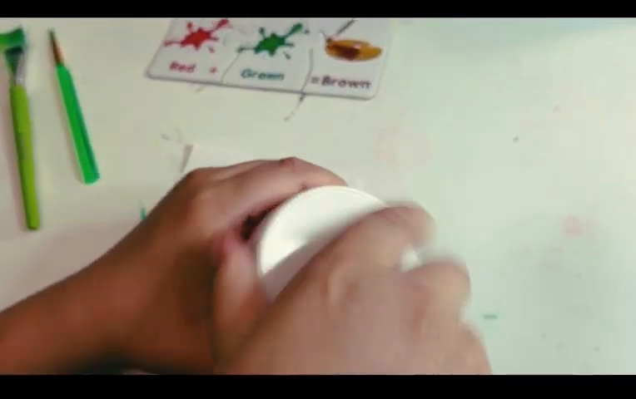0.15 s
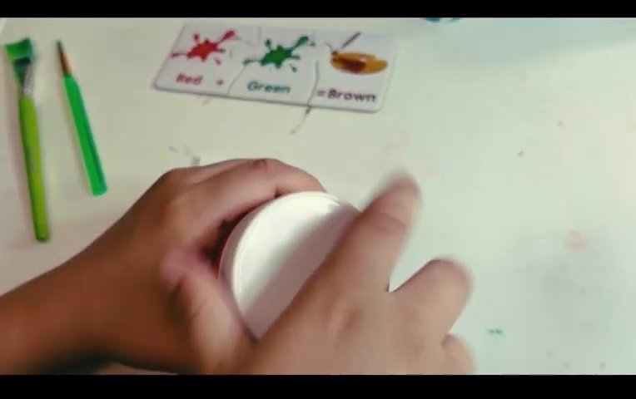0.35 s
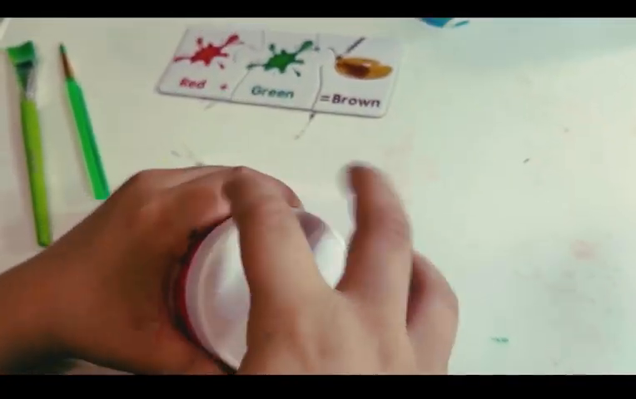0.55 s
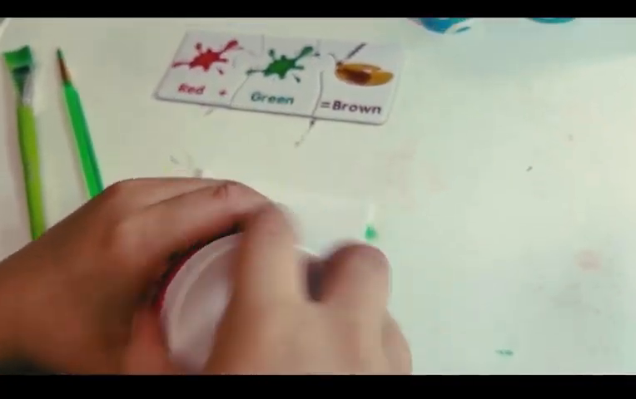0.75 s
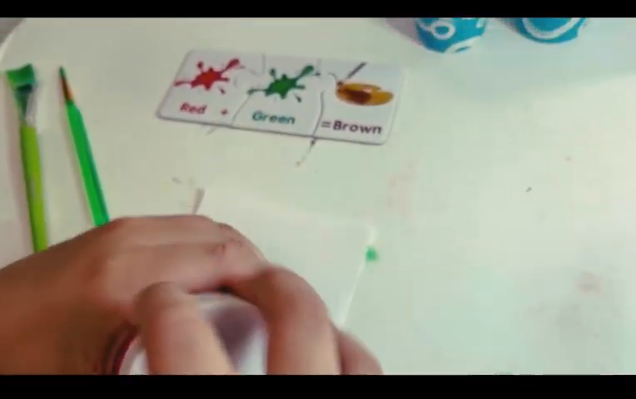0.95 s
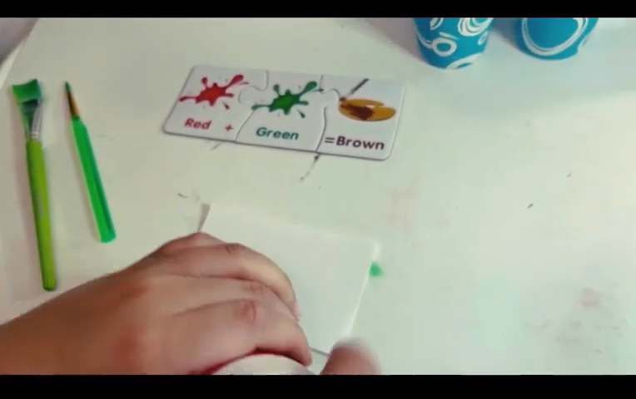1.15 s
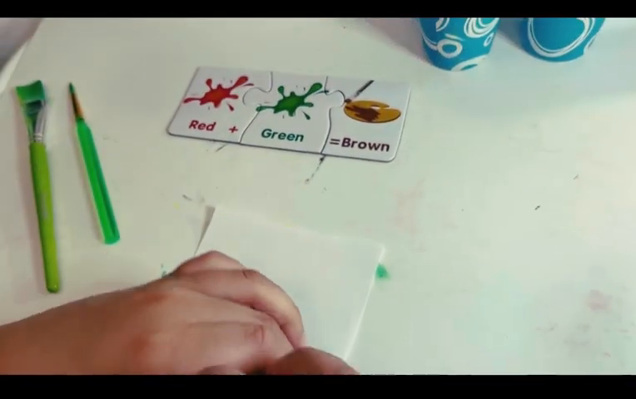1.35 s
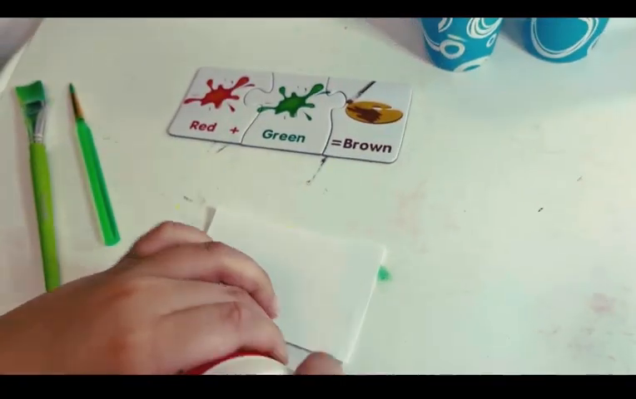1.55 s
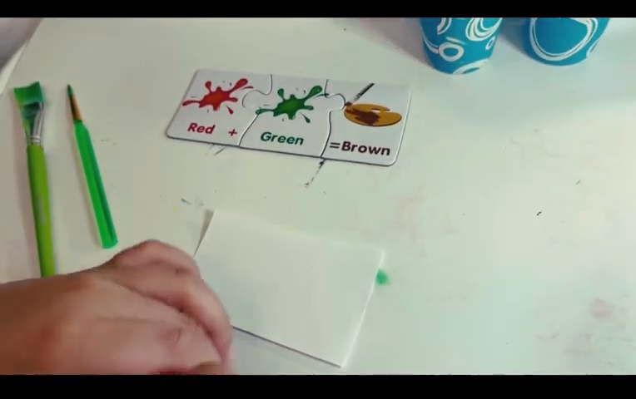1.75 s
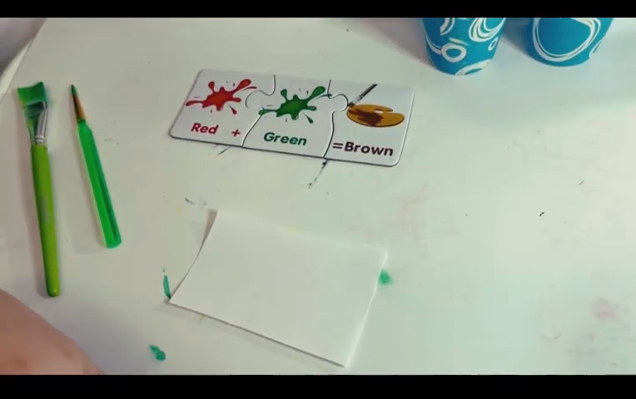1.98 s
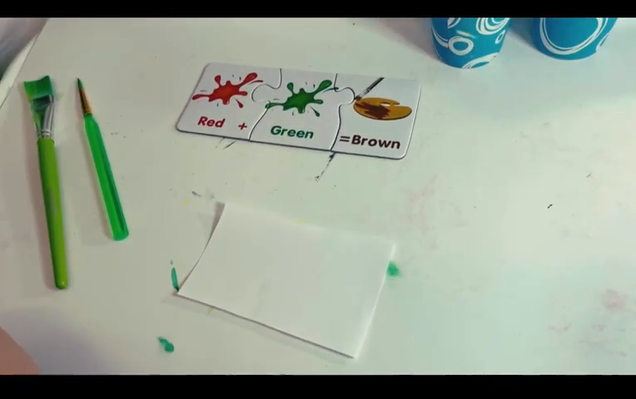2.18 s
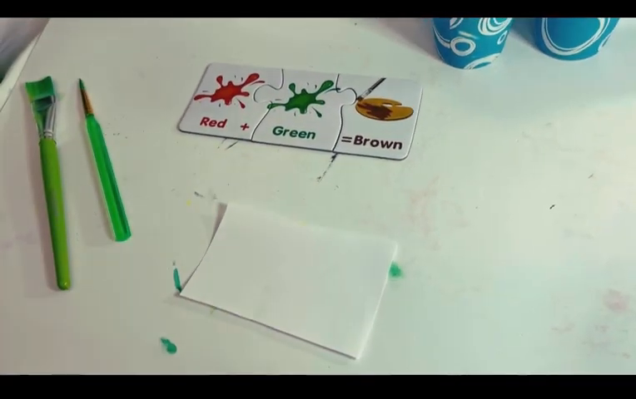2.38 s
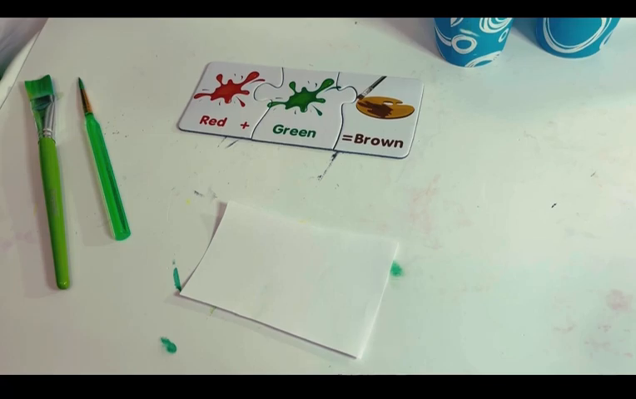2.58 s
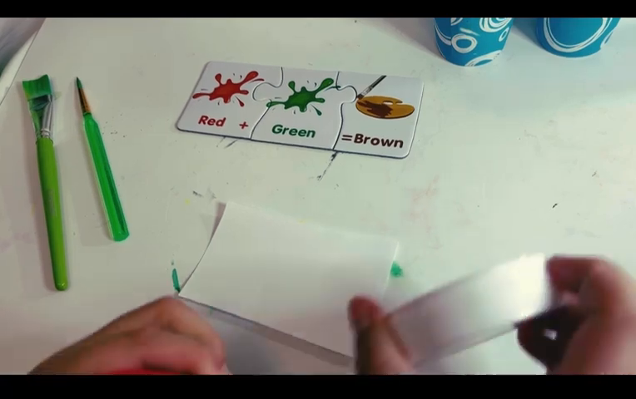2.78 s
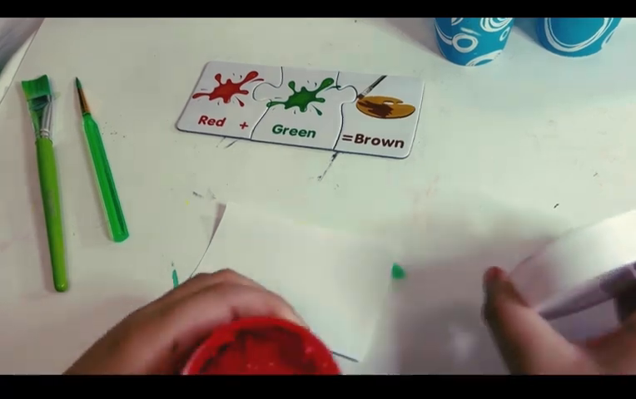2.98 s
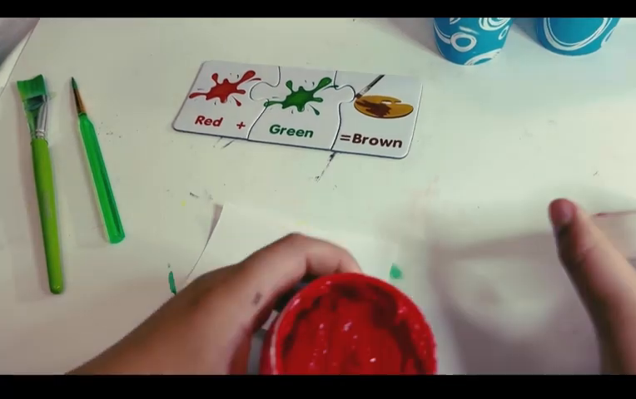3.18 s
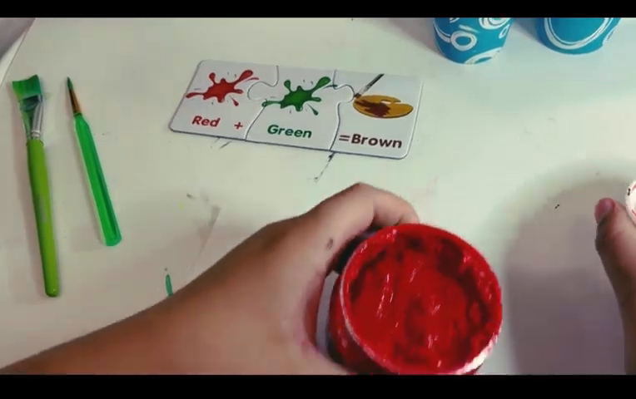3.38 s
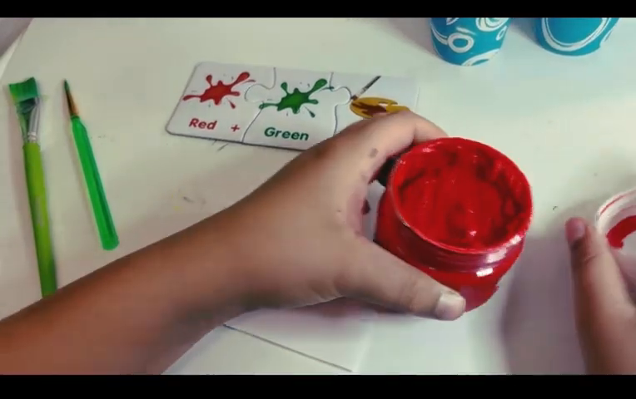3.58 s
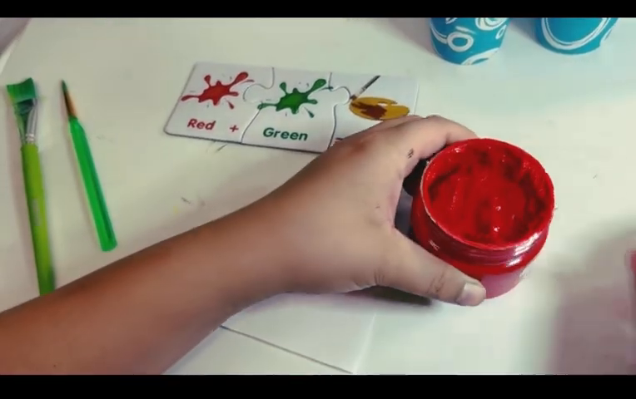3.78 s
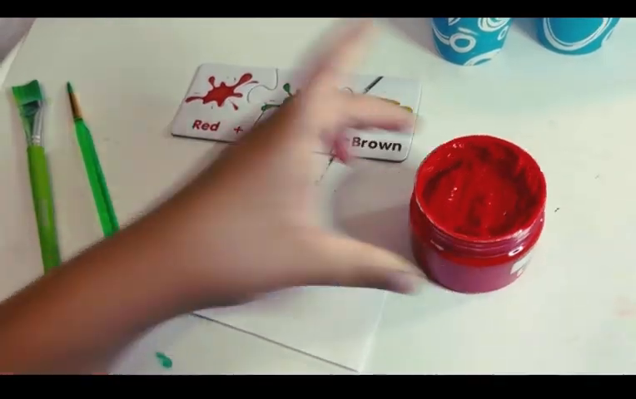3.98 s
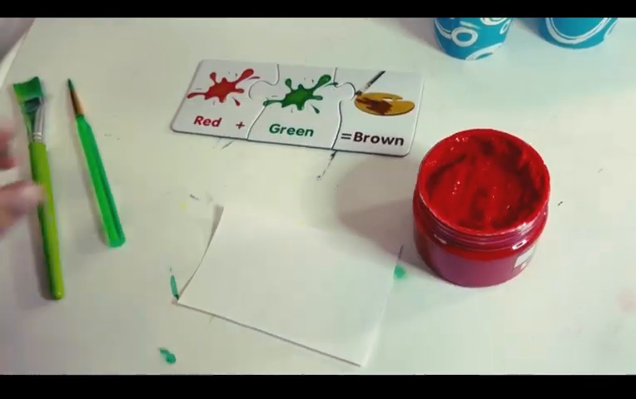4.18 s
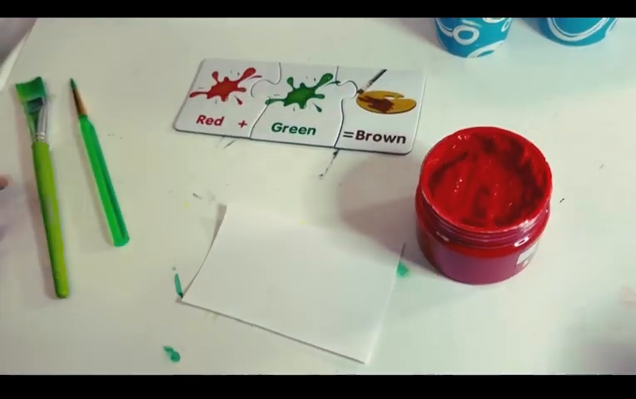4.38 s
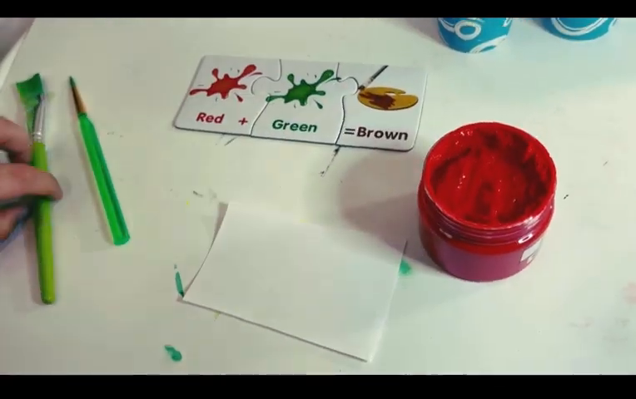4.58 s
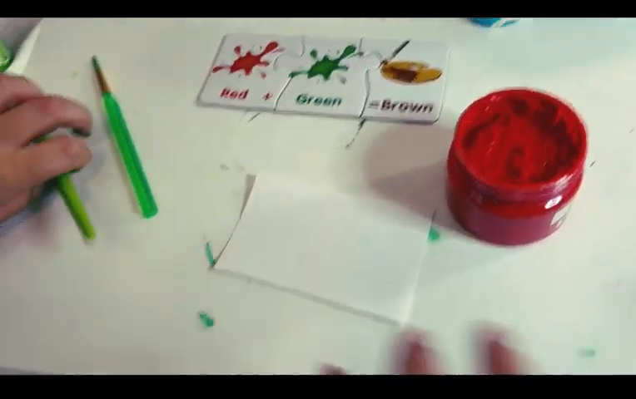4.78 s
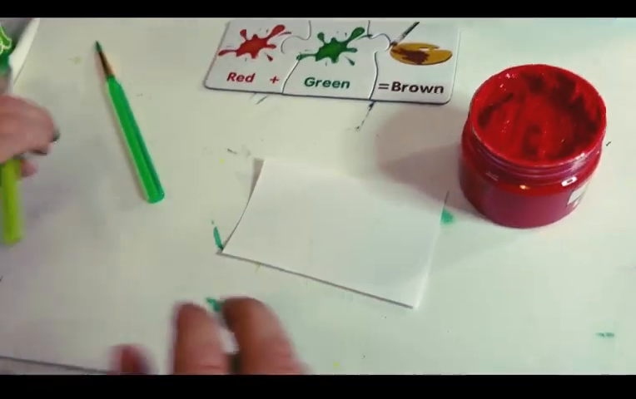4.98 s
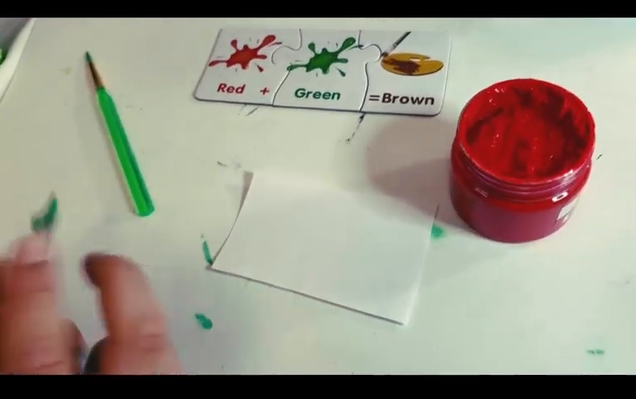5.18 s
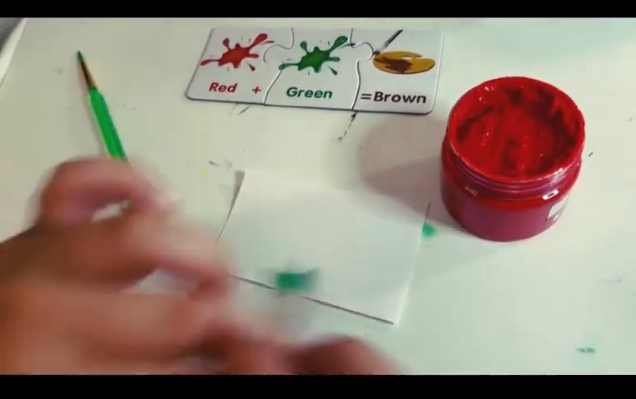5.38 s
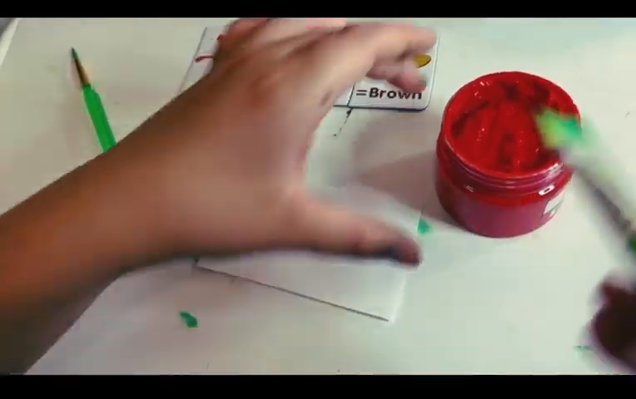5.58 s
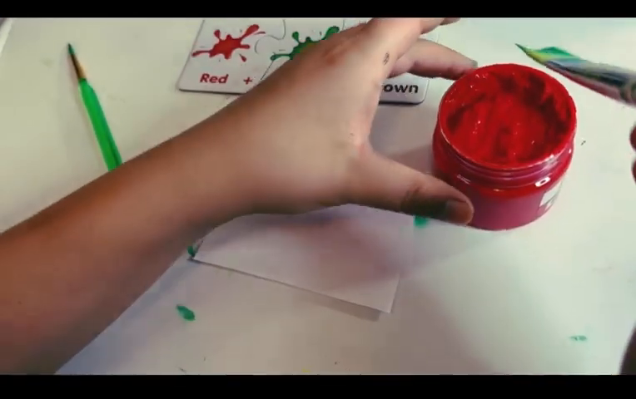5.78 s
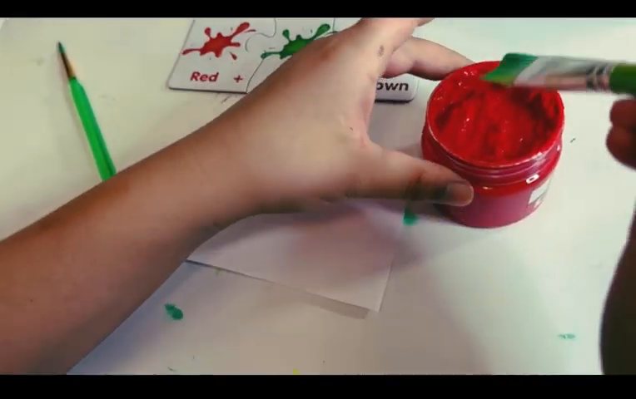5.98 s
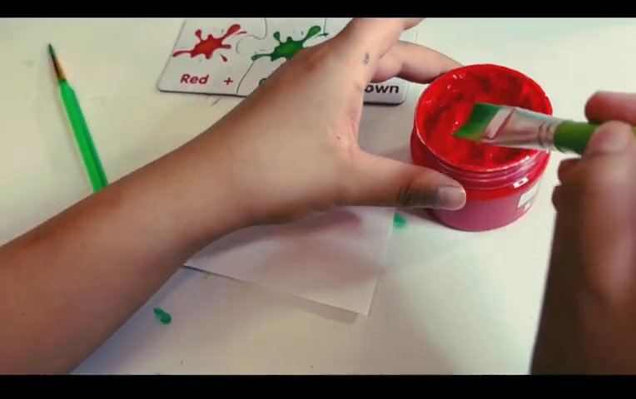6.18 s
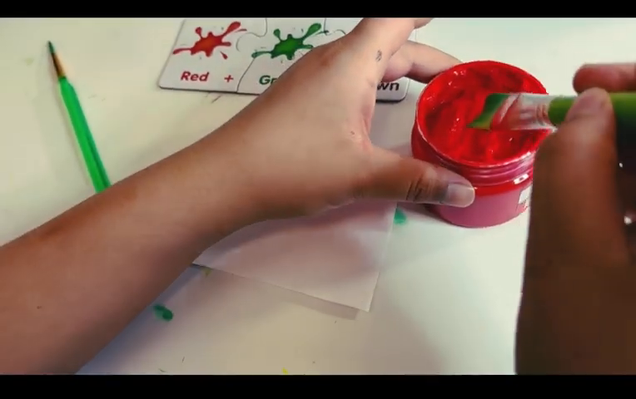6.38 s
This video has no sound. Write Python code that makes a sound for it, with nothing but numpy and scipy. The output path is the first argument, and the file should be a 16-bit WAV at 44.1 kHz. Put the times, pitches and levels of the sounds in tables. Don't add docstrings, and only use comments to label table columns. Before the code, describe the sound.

Close stereo handling sounds over a faint room rumble and airy hush. Thread of a plastic jar lid sticks and slips in bursts of sharp hollow clacks and gritty rubbing, strongest around the first second. After a lull the lid scrapes loose. Much quieter afterwards: rustling hands, a small lid knock, dull thumps and a low hum from the table top, light ticks, tiny wet skin squeaks.

```python
import sys
import numpy as np
from scipy import signal
from scipy.fft import rfft, irfft
from scipy.io import wavfile

SR = 44100
rng = np.random.default_rng(int(sys.argv[2]) if len(sys.argv) > 2 else 0)


def pcm_store(signal):
    levels = np.round(np.clip(np.atleast_2d(signal), -1, 1) * 32767)
    wavfile.write(sys.argv[1], SR, levels.astype(np.int16).T)


def convert_level_to_amplitude(level_db):
    exponent = np.asarray(level_db, float) / 20
    return 10 ** exponent


N = 284223


def at_hz(points, hz):
    p = np.array(points, float)
    return np.interp(np.log(hz + 1), np.log(p[:, 0] + 1), p[:, 1])


def rms_one(x):
    return x / np.sqrt(np.mean(x ** 2) + 1e-20)


def noise():
    return rng.standard_normal(N)


def in_time(rows):
    s, *columns = np.transpose(rows)
    return [np.interp(np.arange(N) / SR, s, column) for column in columns]


def joined(parts):
    rows = []
    for part in parts:
        if rows and part[0][0] - rows[-1][0] > .3:
            rows.append((rows[-1][0] + .03, -110, *rows[-1][2:]))
            rows.append((part[0][0] - .03, -110, *part[0][2:]))
        rows += part
    end = (rows[-1][0] + .03, -110, *rows[-1][2:])
    return in_time(sorted(rows + [end]))


def drift(rate_hz):
    r = np.exp(-80 * np.pi * rate_hz / SR)
    slow = signal.lfilter([1], [1, -2 * r, r * r], rng.standard_normal(N // 40 + 2002))[2000:]
    return np.interp(np.arange(N) / 40, np.arange(len(slow)), rms_one(slow))


def ring(clicks, hz, t60):
    r = convert_level_to_amplitude(-60 / (max(t60, .002) * SR))
    w = 2 * np.pi * hz / SR
    return signal.lfilter([0, np.sin(w)], [1, -2 * r * np.cos(w), r * r], clicks + 1e-18)


def resonance(x, hz, width_hz):
    r = np.exp(-np.pi * width_hz / SR)
    rise = np.array([1, 0, -1]) * (1 - r * r) / 2
    fall = [1, -2 * r * np.cos(2 * np.pi * hz / SR), r * r]
    return signal.lfilter(rise, fall, signal.lfilter(rise, fall, x))


def coloured(x, spectrum):
    hz = np.fft.rfftfreq(N, 1 / SR)
    return rms_one(irfft(rfft(x) * convert_level_to_amplitude(at_hz(spectrum, hz)), N))


def grains(per_s, spread_db):
    sizes = convert_level_to_amplitude(spread_db * np.minimum(rng.exponential(1, N), 5))
    signs = rng.choice([-1, 1], N)
    return rms_one(sizes * signs * (rng.random(N) < per_s / SR))


def struck(times, peak_db, modes, contact_s, scatter_db):
    out = np.zeros(N)
    at = (np.asarray(times) * SR).astype(int)
    luck = rng.standard_normal((len(at), len(modes)))
    for k, (hz, level_db, t60) in enumerate(modes):
        force = np.zeros(N)
        np.add.at(force, at, convert_level_to_amplitude(peak_db + level_db + scatter_db * luck[:, k]))
        out += ring(force, hz, t60)
    r = np.exp(-1 / (contact_s * SR))
    return signal.lfilter([1 - r], [1, -r], out)


# f/Hz, phase/rad
PORT_LEAD = [(0, 0), (860, .7), (1250, .5), (1900, .9), (3000, .9), (4650, .4), (5860, -.9), (7000, -1.8),
             (7800, -2.85), (8900, -3.4), (11200, -6.0), (12900, -6.55), (14600, -9), (16500, -9.6)]
# f/Hz, level difference/dB
PORT_BALANCE = [(60, 0.0), (110, 1), (200, 0.0), (380, 3.5), (700, -5.5), (1290, -3.5), (2380, 2.5),
                (4400, 3.5), (8120, 3), (15000, -1)]


def ports(x):
    hz = np.fft.rfftfreq(N, 1 / SR)
    half_lead = np.exp(.5j * np.interp(hz, *np.transpose(PORT_LEAD)))
    half = convert_level_to_amplitude(at_hz(PORT_BALANCE, hz) / 2) * half_lead
    return np.array([irfft(rfft(x) * half, N), irfft(rfft(x) / half, N)])


# f/Hz, share of power/1
DIFFUSE = [(60, .05), (290, .2), (700, .6), (1500, .6), (2500, .35), (6000, .06), (7500, .002),
           (15000, .002)]


def spread(make):
    share = np.clip(at_hz(DIFFUSE, np.fft.rfftfreq(N, 1 / SR)), 0, 1)
    common = ports(make())
    own = np.array([make(), make()])
    return irfft(rfft(common) * np.sqrt(1 - share) + rfft(own) * np.sqrt(share), N)


# t/s, rumble level/dB, air level/dB
ROOM = [(0.0, -57, -76), (0.45, -64.5, -71.5), (0.61, -65, -65), (1.0, -58, -94), (1.2, -68, -59.5),
        (1.61, -60.5, -73), (1.97, -63.5, -74.5), (2.53, -68.5, -77), (2.87, -64, -80), (3.1, -66.5, -74.5),
        (3.75, -62.5, -66), (4.05, -59.5, -71), (4.64, -60, -76), (4.9, -66.5, -81), (5.87, -61.5, -74),
        (6.1, -64, -80), (6.44, -65.5, -78)]
# f/Hz, level/dB per Hz
RUMBLE = [(15, -38), (25, -3.5), (65, 1), (167, -1), (221, -6), (270, -2), (313, -10), (408, -14),
          (532, -16.5), (600, -22.5), (780, -55.5), (1320, -120)]
# f/Hz, level/dB per Hz
AIR = [(250, -8), (500, -2), (900, -0.5), (1500, -3), (2500, -17), (6000, -24.5), (15000, -33.5)]


def room_air():
    rumble_db, air_db = in_time(ROOM)
    rumble = spread(lambda: coloured(noise(), RUMBLE))
    air = spread(lambda: coloured(noise(), AIR))
    return convert_level_to_amplitude(rumble_db + 1.5 * drift(6)) * rumble + convert_level_to_amplitude(air_db + 1 + 0.76 * drift(10)) * air


def patchy(spectrum, edges_hz, depth_db):
    whole = spread(lambda: coloured(grains(per_s=6000, spread_db=1.5), spectrum))
    out = 0
    for edge in zip(edges_hz, edges_hz[1:]):
        band = signal.sosfilt(signal.butter(2, edge, "band", fs=SR, output="sos"), whole)
        out = out + band * convert_level_to_amplitude(depth_db * np.tanh(drift(7.9)))
    return out


# t/s, dull level/dB, bright level/dB
RUSTLE = [
    [(0.0, -64.5, -71.5), (0.236, -56.5, -65.5), (0.25, -63, -66)],
    [(0.28, -68, -86), (0.332, -77, -84), (0.39, -70, -68)],
    [(0.41, -62, -70), (0.57, -53.5, -64), (0.66, -82, -90)],
    [(0.69, -53.5, -75), (0.814, -64, -67), (0.91, -74, -79)],
    [(0.94, -74, -73), (1.044, -74, -79), (1.12, -98, -108)],
    [(1.15, -37.5, -49), (1.16, -60.5, -68.5), (1.45, -75, -73)],
    [(1.47, -74, -93), (1.51, -101, -108), (1.52, -90, -72)],
    [(1.55, -59, -60), (1.598, -65, -79), (1.642, -57.5, -64), (2.092, -90, -85.5), (2.2, -83.5, -74.5)],
    [(2.3, -41, -51), (2.372, -80, -87), (2.62, -72, -73)],
    [(2.72, -76, -89), (2.928, -74.5, -61.5), (2.96, -72.5, -94)],
    [(3.0, -59, -69.5), (3.108, -51.5, -58), (3.158, -61.5, -73), (3.36, -64, -63.5)],
    [(3.39, -67.5, -76), (3.616, -56.5, -65.5), (3.926, -61, -77), (4.048, -80.5, -89), (4.128, -74, -72),
     (4.26, -83, -84.5)],
    [(4.3, -66, -87), (4.336, -58.5, -67.5), (4.762, -80, -88), (4.802, -60.5, -74), (4.864, -91, -93.5),
     (5.05, -101, -103)],
    [(5.09, -93, -87), (5.12, -72, -77), (5.408, -85.5, -71), (5.452, -83.5, -94), (5.86, -74.5, -72.5),
     (6.0, -88.5, -92)],
    [(6.05, -101, -108), (6.218, -77.5, -94), (6.236, -86, -108), (6.44, -99, -107)],
]
# f/Hz, level/dB per Hz
DULL = [(900, -17), (1600, -6.5), (2700, -0.5), (4000, -1.5), (6000, -7.5), (8000, -8.5), (11000, -29.5)]
# f/Hz, level/dB per Hz
BRIGHT = [(4000, -24), (6500, -6.5), (8500, 2.5), (11000, -3.5), (14000, -6.5), (16000, -12)]


def rustle():
    dull_db, bright_db = joined(RUSTLE)
    flutter = convert_level_to_amplitude(1.5 * drift(70))
    dull = patchy(DULL, [600, 1300, 2000, 2900, 4200, 6000, 9000], depth_db=3.5)
    bright = patchy(BRIGHT, [4000, 7000, 10000, 12500, 16500], depth_db=2.2)
    return flutter * (convert_level_to_amplitude(dull_db + 1.5) * dull + convert_level_to_amplitude(bright_db + 11.5) * bright)


# t/s, rub level/dB, crackle level/dB re rub
RUB = [
    [(0.0, -51, -12), (0.03, -81, -14.0), (0.224, -45, -5), (0.3, -88, -14.0)],
    [(0.32, -78, -14.0), (0.352, -85, -14.0), (0.42, -64, -17)],
    [(0.43, -78.5, -14.0), (0.454, -43.5, -27), (0.67, -51, -37)],
    [(0.68, -37, -35), (0.82, -48.5, -10), (0.92, -70, -19)],
    [(0.93, -75, -10), (0.974, -43, -12.5), (1.13, -64.5, -12.5)],
    [(1.14, -28, -12.5), (1.212, -54, -15.5), (1.456, -58.5, -10), (1.5, -95.5, -18)],
    [(1.52, -79, -16), (1.538, -36, -30), (1.548, -36, -20.5), (1.596, -52, -16.5), (2.14, -85, -20),
     (2.2, -66.5, -11)],
    [(2.22, -69, -2.5), (2.278, -30, -13.5), (2.45, -101.5, -16.5)],
    [(3.25, -85, -14.5), (3.322, -54, -6), (3.45, -82, -11.5)],
]
# f/Hz, level/dB, t60/s
LID = [(1260, 0, 0.026), (1323, -5.5, 0.037), (2365, -13.5, 0.017), (1500, -17.5, .012)]
# f/Hz, level/dB, t60/s
BELLY = [(260, -8.5, 0.044), (367, -7.5, .04), (553, -5, .03), (700, 3, 0.027), (860, -10, 0.018)]
# f/Hz, level/dB per Hz
CRACK = [(400, -42), (1200, -26), (2200, -10), (3200, -2), (5000, -2), (6600, 3), (8500, 2.5),
         (10800, -4.6), (14000, -8), (16500, -21.5)]


def thread_rub():
    rub_db, crackle_db = joined(RUB)
    force = grains(per_s=1300, spread_db=5.5) * convert_level_to_amplitude(3.0 * drift(56))

    def body(modes):
        return rms_one(sum(convert_level_to_amplitude(level_db) * ring(force, hz, t60) for hz, level_db, t60 in modes))

    smear = rng.standard_normal(60) * np.exp(-np.arange(60) / 20)
    crackle = coloured(signal.lfilter(smear, [1], force), CRACK)
    return convert_level_to_amplitude(rub_db - 7.5) * (body(LID) + convert_level_to_amplitude(-4) * body(BELLY) + convert_level_to_amplitude(crackle_db) * crackle)


def cracks(times, peak_db):
    force, span = np.zeros(N), np.arange(700)
    luck = rng.standard_normal((len(times), len(span) + 1))
    length = .0015 * SR * convert_level_to_amplitude(1.5 * luck[:, :1])
    burst = luck[:, 1:] * np.exp(-span / length) * (1 - np.exp(-span / 6.8))
    at = (times * SR).astype(int)[:, None] + span
    np.add.at(force, at, convert_level_to_amplitude(peak_db)[:, None] * burst)
    return coloured(force, CRACK) * np.sqrt(np.mean(force ** 2))


# t/s, peak level/dB, crack level/dB re peak, belly level/dB re peak
SLIPS = [(0.084, -50, -28, -10), (0.106, -50, -43, -24), (0.124, -42.5, -29, -23), (0.166, -41, -11, -25),
         (0.212, -39, -12, -33), (0.226, -34.5, -4.5, -15), (0.406, -38.5, -6, -4.5),
         (0.436, -39.5, -23, -9), (0.455, -24.5, -24, -8.5), (0.487, -41.5, 1, -5), (0.51, -33.5, -16, -10),
         (0.528, -25, -21, -3), (0.575, -12.5, -32, -29), (0.68, -21, -14, -9), (0.707, -21.5, -14, -10.5),
         (0.754, -44, -28, -14), (0.775, -37.5, -23, -8), (0.792, -33.5, -18.5, -11),
         (0.94, -43, -1.5, -24), (0.948, -39.5, -3, -17), (0.971, -30.5, -21.5, -10.5),
         (0.989, -32.5, -15.5, -8.5), (1.031, -22.5, -20, -22), (1.05, -41.5, -30, -15),
         (1.144, -11, -10, -22), (1.188, -39, -21, -3.5), (1.355, -43.5, 0, -4.5), (1.371, -40.5, -18, 1),
         (1.424, -41, -18, -14), (1.441, -38, -15, -8), (1.544, -20, -11, -28), (1.622, -42, -12.5, -3.5),
         (1.646, -48.5, -0.5, -1), (1.721, -47.5, -2, -3.5), (1.736, -51.5, 2.5, 2.5),
         (1.829, -57.5, -9, -1.5)]
RELEASE = [(.14, -44, -17.5, -9.5), (.185, -42.5, -15.5, -12), (.4, -44.5, 0, -11), (.498, -39, -7, -18),
           (.504, -39, -5.5, -17), (.518, -33.5, -4.5, -13), (.561, -39.5, -4, -18),
           (.583, -22.5, -26, -13), (.591, -26, -17.5, -25), (.802, -35, -15.5, -3),
           (1.026, -35, -3.5, -18), (1.137, -34.5, -28, -12.5), (1.146, -32.5, -16.5, -10),
           (1.192, -37, -12.5, -1), (1.246, -42.5, -10, -6.5), (1.268, -34, -10.5, 0.5),
           (1.277, -36.5, 3.5, -18), (1.532, -43.5, -7, 2), (1.56, -39.5, -2.5, -18),
           (1.568, -37, -6.5, -6), (2.2515, -45, 5, -24), (2.255, -33, 0, -27), (2.2695, -32, -0.5, -13),
           (2.2775, -40, 1.9, -23), (2.285, -37, -4, -24), (2.289, -32.5, -11, -20),
           (2.296, -40, -3.5, -24.5), (2.306, -44, -3, -23), (3.306, -46.5, -2, -27),
           (3.333, -33.5, -16.5, -25)]


def lid_clicks():
    s, peak_db, crack_db, belly_db = np.transpose(SLIPS + RELEASE)
    snap = cracks(s - .0003, peak_db + crack_db + 6.5)
    cavity = struck(s + .0008, peak_db - 5.5, LID, contact_s=.00006, scatter_db=2.2)
    belly = struck(s + .001, peak_db + belly_db - 1.5, BELLY, contact_s=.0001, scatter_db=2.5)
    return cavity + belly + snap


# start t/s, length/s
SWISH_TIMES = [(2.63, .08), (2.63, .07), (2.89, .07), (3.58, .36), (4.43, .1), (4.57, .07), (4.75, .09),
               (5.19, .06), (5.32, .13), (5.6, .08), (5.43, .15), (4.06, .12), (2.25, .11), (4.31, .11),
               (4.03, .14), (.15, .11), (.92, .07), (1.245, .06), (2.25, .03)]
# centre f/Hz, width/Hz, level/dB
SWISHES = [(9722.2, 17000, -57.5), (4440, 3700, -73.5), (9000, 12000, -60), (2830, 690, -62.5),
           (4000, 830, -70), (7900, 10000, -60.5), (7000, 13000, -63.5), (9000, 11000, -73),
           (8500, 4300, -68), (9860, 1150, -59.5), (490, 290, -63), (10900, 4000, -69.5),
           (7407.4, 24400, -47.5), (2407.4, 2040, -56), (324.07, 130, -66.5), (4000, 820, -55),
           (7000, 3800, -54), (7000, 15000, -46), (3660, 140, -47)]


def swishes():
    out, t = np.zeros(N), np.arange(N) / SR
    fibres = grains(per_s=4300, spread_db=3.0) * convert_level_to_amplitude(3.3 * drift(42))
    for (s, length), (hz, width_hz, level_db) in zip(SWISH_TIMES, SWISHES):
        swell = np.sin(np.pi * np.clip((t - s) / length, 0, 1) ** .7)
        out += convert_level_to_amplitude(level_db) * swell * rms_one(resonance(fibres, hz, width_hz))
    return out


# t/s, peak level/dB, ring f/Hz, t60/s
THUDS = [(3.783, -34.5, 70, .12), (3.837, -39.5, 52.7, 0.18), (3.861, -41, 60, 0.076),
         (3.943, -36, 60.3, 0.13), (4.299, -32, 65, 0.075), (4.422, -35, 69, .08), (4.44, -37, 59.4, 0.13),
         (2.298, -47, 70, 0.087), (3.618, -48, 50.6, .1), (5.5, -44.5, 90, .1), (5.931, -53, 65.2, 0.16),
         (6.2, -47.5, 65.4, 0.069)]
# t/s, level/dB
HUM = [
    (3.95, -47),
    (4.008, -75),
    (4.054, -70),
    (4.128, -56),
    (4.536, -62),
    (4.78, -55.5),
    (4.95, -83.5),
]


def table_top():
    out, t = np.zeros(N), np.arange(8000) / SR
    for s, peak_db, hz, t60 in THUDS:
        phase = 2 * np.pi * hz * (t + 0.0038 * (1 - np.exp(-t / 0.0077)))
        onset = 1 - np.exp(-t / 0.0039)
        out[int(s * SR):][:len(t)] += convert_level_to_amplitude(peak_db - 60 * t / t60) * np.sin(phase) * onset
    before, after = (HUM[0][0] - .05, -110), (HUM[-1][0] + .05, -110)
    hum_db, = in_time([before, *HUM, after])
    hum_hz = 121 + 3.3 * drift(9.9)
    hum = np.sin(2 * np.pi * np.cumsum(hum_hz) / SR) * convert_level_to_amplitude(1.8 * drift(15))
    return out + convert_level_to_amplitude(hum_db) * rms_one(hum)


# t/s, peak level/dB, tick from f/Hz, tick to f/Hz, length/s,
# wood ring level/dB re peak
TAPS = [(2.976, -43, 900, 9000, 0.0018, -36), (3.07, -47, 300, 1110, 0.0065, -18),
        (3.608, -33, 700, 4000, 0.0017, -31.5), (4.073, -53.5, 200, 580, 0.009, 1),
        (4.125, -42.5, 400, 1420, 0.0057, -1), (4.322, -41, 300, 1290, 0.0073, -17),
        (4.415, -46.5, 1900, 5000, 0.0052, -7), (4.6, -41, 895, 13800, 0.0076, -18),
        (4.928, -49, 1013, 1500, 0.0039, -35), (5.4, -41.5, 4000, 14000, 0.0023, -25),
        (5.495, -51.5, 400, 3220, .002, -2.5), (6.202, -54, 1290, 7000, 0.0042, -15.5)]
# f/Hz, level/dB, t60/s
WOOD = [(250.4, 1.5, 0.11), (331, 1.5, 0.059), (528, -4, 0.029)]


def taps():
    out, t = np.zeros(N), np.arange(2000) / SR
    for s, peak_db, from_hz, to_hz, length, _ in TAPS:
        band = signal.butter(4, [from_hz, to_hz], "band", fs=SR, output="sos")
        tick = signal.sosfilt(band, rng.standard_normal(len(t)) * np.exp(-t / length))
        out[int(s * SR):][:len(t)] += convert_level_to_amplitude(peak_db) * tick / np.max(np.abs(tick))
    s, peak_db, *_, wood_db = np.transpose(TAPS)
    return out + struck(s, peak_db + wood_db + 1.5, WOOD, contact_s=.0001, scatter_db=4.0)


# t/s, length/s, f/Hz, width/Hz, level/dB, throb rate/Hz
SQUEAKS = [
    (5.29, .1, 870, 90, -72, 0.1),
    (5.3, .09, 1500, 400, -76, 0.1),
    (6.31, .06, 870, 90, -75, 0.1),
    (6.3, .05, 1150, 90, -78, 0.1),
    (6.3, .05, 3900, 300, -80, 0.1),
    (5.09, .1, 5900, 700, -76, 75),
    (6.2, .04, 1750, 80, -77, 0.1),
]


def squeaks():
    out, t = np.zeros(N), np.arange(N) / SR
    for s, length, hz, width_hz, level_db, per_s in SQUEAKS:
        tone = rms_one(resonance(noise(), hz, width_hz))
        gate = np.sin(np.pi * np.clip((t - s) / length, 0, 1)) ** .5
        throb = np.cos(np.pi * per_s * (t - s)) ** 2
        out += convert_level_to_amplitude(level_db) * gate * tone * throb
    return out


def walls(x):
    t = np.arange(int(.3 * SR)) / SR
    t60, first_s = .14, .004

    def reflected():
        tail = rng.standard_normal(len(t)) * convert_level_to_amplitude(-60 * t / t60) * (t > first_s)
        dull = signal.lfilter([.5], [1, -.5], tail)
        return signal.fftconvolve(x, rms_one(dull) / np.sqrt(len(t)))[:N]

    return spread(reflected)


def scene():
    no_bass = signal.butter(3, 180, "high", fs=SR, output="sos")
    jar = signal.sosfilt(no_bass, lid_clicks() + thread_rub())
    close = jar + taps() + squeaks()
    echo = convert_level_to_amplitude(-15) * walls(close)
    return ports(close + swishes() + table_top()) + echo + rustle() + room_air()


def band_limit(x):
    return signal.sosfilt(signal.butter(12, 16510, fs=SR, output="sos"), x)


def record(dry):
    cut = signal.sosfilt(signal.butter(2, 42, "high", fs=SR, output="sos"), dry)
    mix = signal.sosfilt(signal.cheby2(10, 60, 16600, fs=SR, output="sos"), cut)
    return band_limit(mix)


dry = scene()
out = record(dry)
pcm_store(out)
```